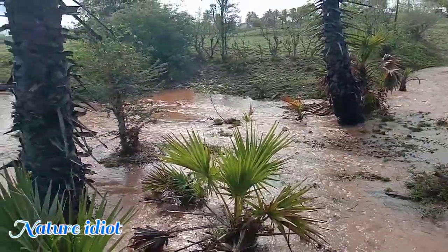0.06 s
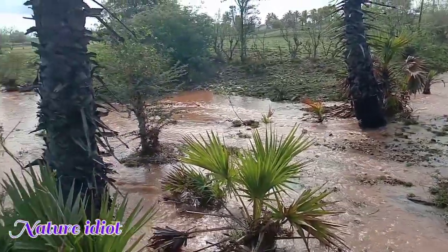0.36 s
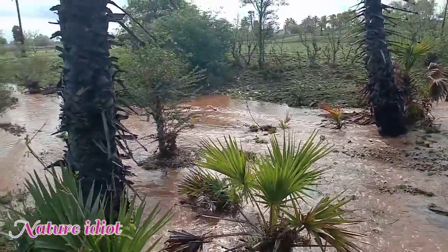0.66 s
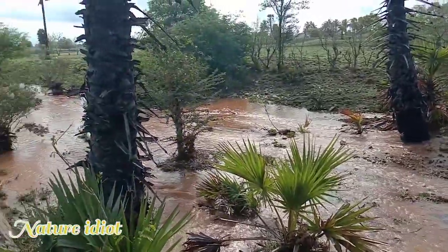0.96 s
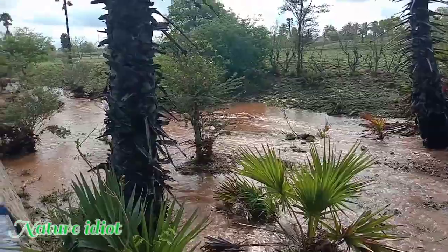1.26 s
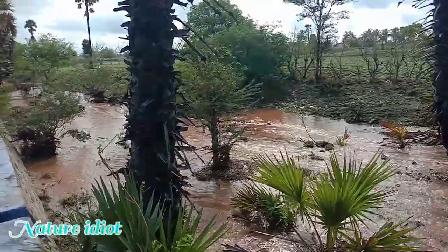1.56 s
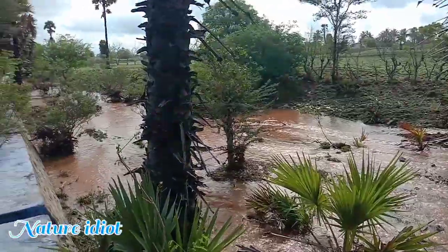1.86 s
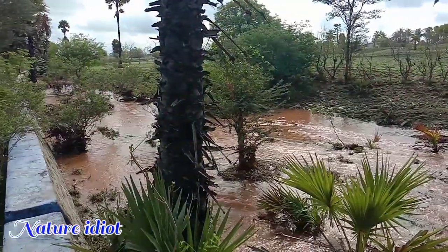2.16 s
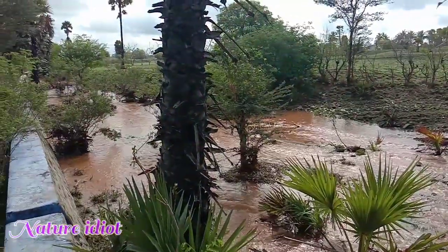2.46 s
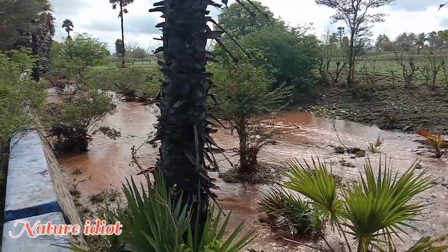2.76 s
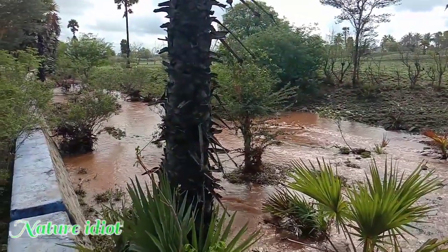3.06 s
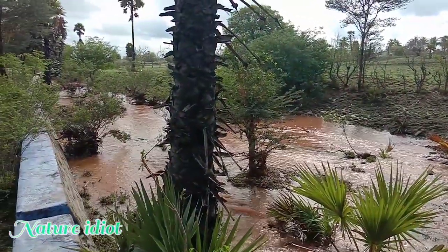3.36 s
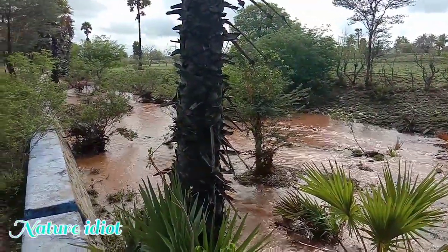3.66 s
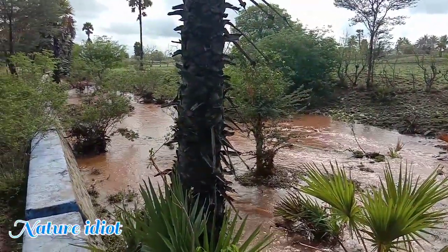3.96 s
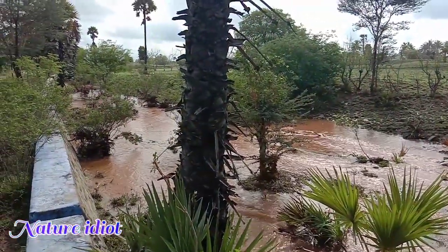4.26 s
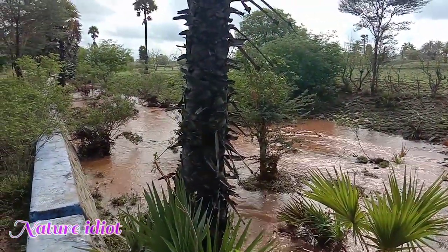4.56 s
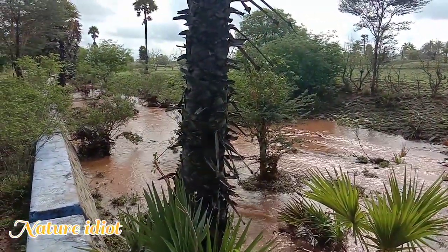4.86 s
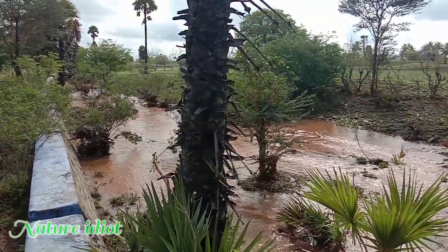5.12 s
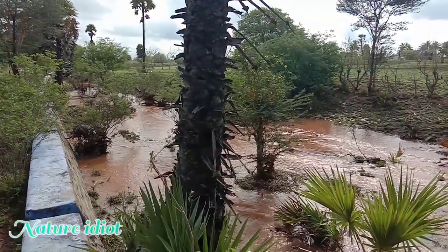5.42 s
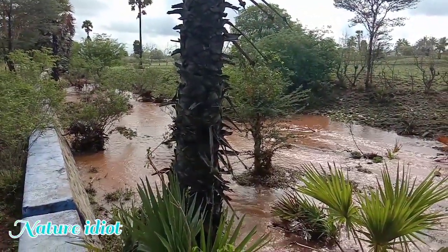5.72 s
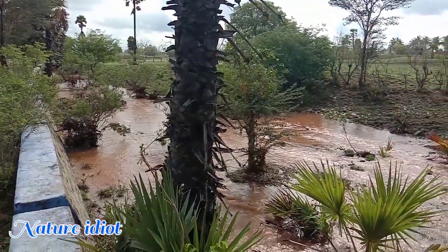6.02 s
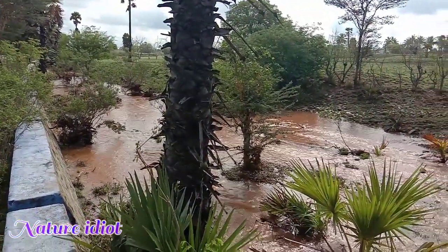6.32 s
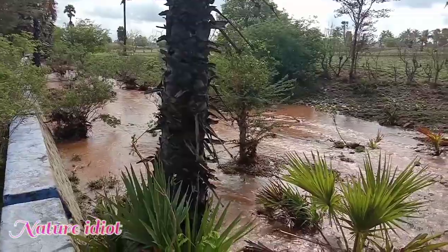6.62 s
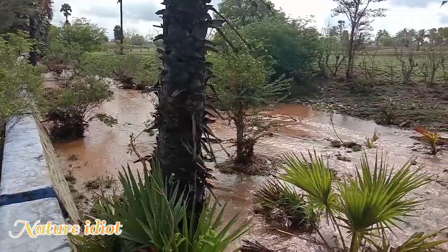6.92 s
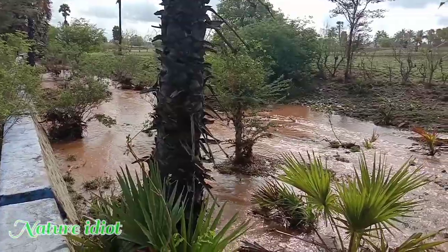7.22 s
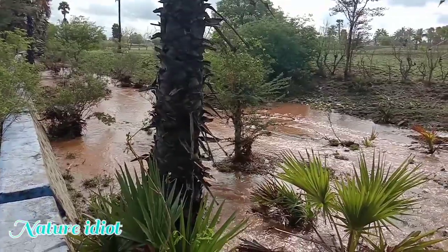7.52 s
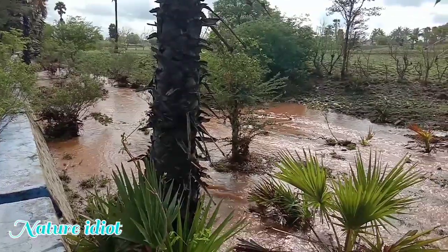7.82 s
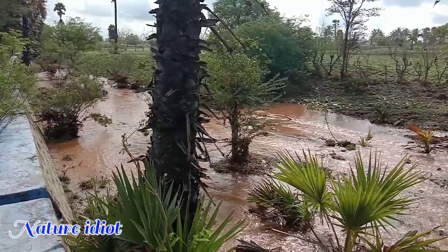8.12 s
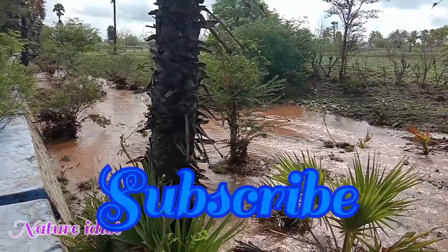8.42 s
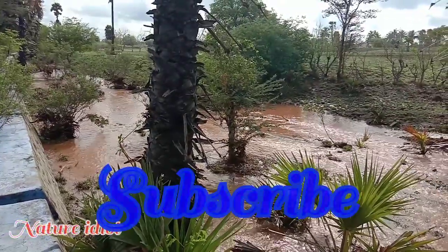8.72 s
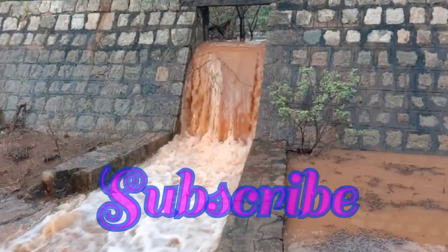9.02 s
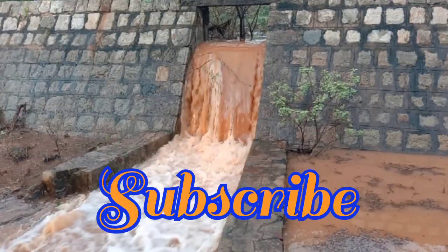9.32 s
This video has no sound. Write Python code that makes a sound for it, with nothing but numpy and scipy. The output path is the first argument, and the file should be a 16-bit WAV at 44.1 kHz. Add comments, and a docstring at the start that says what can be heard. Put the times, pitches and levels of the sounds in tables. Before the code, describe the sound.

A stream rushes and splashes under a steady frog chorus, a chirping cricket and small birds, with a few low microphone bumps.

```python
"""Beside a flooded stream: droplets splash and trapped air bubbles ring over a low rush.
Far frogs pulse their vocal sacs, purring on one note; a close cricket chirps evenly with its wings.
Small birds chip, whistle and rasp; far insects shimmer. Sharp plips, crackles and rustles dot the scene.
Wind and a hand bump the microphone, with one low knock; the sound stops dead near the end."""
import sys
import numpy as np
from scipy import signal
from scipy.fft import rfft, irfft
from scipy.io import wavfile
from scipy.ndimage import uniform_filter1d

SR = 44100
rng = np.random.default_rng(int(sys.argv[2]) if len(sys.argv) > 2 else 0)


def output_pcm(signal):
    """Save a mono or channel-first signal as 16-bit PCM at the path in sys.argv[1].

    Samples are clipped to [-1, 1] before scaling.
    """
    pcm = np.clip(np.atleast_2d(signal).T, -1, 1) * 32767
    wavfile.write(sys.argv[1], SR, np.round(pcm).astype(np.int16))


N = 422458
TIME = np.arange(N) / SR
STOP_S = 8.948


def stream():
    """Running water: a low rush, countless splashing droplets and a fine fizz."""
    # spectra of the three layers: freq_hz, gain_db
    rush_shape = [(26, -53), (45, -17.5), (57, -8), (114, 2.5), (188, -5.5), (239, 1), (317, -26.5),
                  (360, 2), (453, -0.5), (727, -6), (950, 2), (1240, -27.5), (2090, -120)]
    splash_shape = [(600, -32), (1000, -12), (1700, -7.5), (1900, -1), (2300, -1), (2900, 2), (3300, -8),
                    (3700, -12), (4400, -21), (5500, -23), (6300, -27.5), (7100, -18), (8200, -38)]
    fizz_shape = [(4000, -5), (8200, 0), (10000, 8), (11500, 3.5), (13600, -11.5), (15000, 10),
                  (16000, -3.5)]
    # slow swells: time_s, level_db
    splash_curve = [(0, -49), (3.1, -49.7), (3.9, -52), (5.6, -52), (6.7, -49.5), (8.94, -50)]
    fizz_curve = [(0, -73), (1.3, -77.5), (3, -77.5), (3.6, -72.5), (4.6, -75.5), (5.6, -75.5), (7, -78.5),
                  (8.94, -77.5)]
    rush = patchy(colour(rng.standard_normal(N), rush_shape), depth_db=4)
    rush *= amp(-64 + 1.8 * drift(rate_hz=25))
    spray = amp(3.5) * rng.standard_normal(N) + clicks(per_s=1500, spread_db=2.5)
    splash = patchy(colour(spray, splash_shape), depth_db=3)
    splash *= level(splash_curve) * amp(-.58 + .78 * drift(rate_hz=30))
    mist = rng.standard_normal(N) + amp(-3) * clicks(per_s=470, spread_db=5)
    fizz = patchy(colour(mist, fizz_shape), depth_db=4.5)
    fizz *= level(fizz_curve) * amp(.83 * drift(rate_hz=25))
    return rush + splash + fizz


def patchy(x, depth_db):
    """Splashes land at random, each lifting its own band for a moment; rms 1."""
    spectrum = signal.stft(x, nperseg=512)[2]
    patches = uniform_filter1d(rng.standard_normal(spectrum.shape), size=5, axis=0)
    patches = unit(uniform_filter1d(patches, size=7, axis=1))
    return unit(signal.istft(spectrum * amp(depth_db * patches), nperseg=512)[1][:N])


def gurgles():
    """Bubbles in the stream: a soft burble, a few large glugs and a high tinkle."""
    # large bubbles: start_s, pitch_hz, level_db
    glugs = [(.601, 425, -51), (.762, 411, -50), (2.83, 356.4, -50), (4.082, 456, -50.5),
             (4.665, 401, -50.5), (4.83, 442, -49.5), (4.981, 243, -53), (5.391, 377, -50),
             (6.134, 392.6, -47), (6.409, 245, -53.5)]
    burble = amp(-67.5) * bubbles(low_hz=245.8, high_hz=561.4, cycles=12, spread_db=8.5, count=520)
    for start_s, pitch_hz, level_db in glugs:
        add(burble, start_s, amp(level_db) * bubble(pitch_hz, cycles=13.3, rise=.047))
    tinkle = amp(-59.5) * bubbles(low_hz=1860, high_hz=3245, cycles=16, spread_db=7.5, count=1300)
    return burble + tinkle


def bubbles(low_hz, high_hz, cycles, spread_db, count):
    """Many bubbles of random size and strength; rms 1."""
    out = np.zeros(N)
    for when, smallness, strength in rng.random((count, 3)):
        pitch_hz = low_hz * (high_hz / low_hz) ** smallness
        add(out, when * TIME[-1], amp(spread_db * strength ** 3) * bubble(pitch_hz, cycles, rise=.054))
    return unit(out)


def bubble(pitch_hz, cycles, rise):
    """Trapped air rings and rises in pitch as it nears the surface."""
    age = np.arange(int(3 * cycles / pitch_hz * SR)) * pitch_hz / cycles / SR
    envelope = 3 * age * np.exp(1 - 3 * age)
    return envelope * np.sin(2 * np.pi * cycles * (age + rise * age ** 2 / 2))


def frogs(pulse_hz=34, throb_db=2.3, uneven_db=2.5, wash_db=-1, count=7):
    """Each frog pulses its vocal sac at its own pace; the farthest blur into a wash."""
    # vocal sac resonance: freq_hz, gain_db
    sac_shape = [(650, -39), (870, -37.5), (1050, -8.5), (1190, -4.5), (1250, 4), (1320, -2.5), (1480, -10),
                 (1700, -23.5), (2200, -48.5)]
    pulses = np.zeros(N)
    for pace in np.geomspace(.6, 1.6, count):
        turns = np.cumsum(pulse_hz * pace * np.exp(.12 * drift(rate_hz=8))) / SR + rng.random()
        onsets = np.flatnonzero(np.diff(np.floor(turns)))
        throb = np.sin(2 * np.pi * (5 * pace * onsets / SR + rng.random()))
        polarity = rng.choice([-1, 1], N)[onsets]
        uneven = np.clip(rng.standard_normal(N)[onsets], -2, 2)
        pulses[onsets] += polarity * amp(throb_db * throb + uneven_db * uneven)
    voices = unit(pulses) + amp(wash_db) * rng.standard_normal(N)
    return amp(-49 + .5 * drift(rate_hz=12)) * colour(voices, sac_shape)


def cricket(stroke_s=.0126, pitch_hz=5150, sag_hz=330, duty=.9, lead_db=-10, wander_hz=20):
    """Each wing stroke rings one pulse that sags in pitch; a chirp swells from a soft lead stroke."""
    # runs of evenly spaced chirps: start_s, chirp_count, period_s, strokes_per_chirp, relative_db
    runs = [(.146, 16, .2248, 7, -48.8), (3.756, 10, .2358, 7, -46.8), (6.095, 9, .2297, 7, -48.3),
            (8.218, 3, .214, 6, -49.7), (8.929, 1, .23, 3, -48.5)]
    out = np.zeros(N)
    progress = np.arange(0, 1, 1 / (duty * stroke_s * SR))
    envelope = np.sin(np.pi * progress) ** .83
    chirps = [(start_s + n * period_s, strokes, db)
              for start_s, count, period_s, strokes, db in runs for n in range(count)]
    for (chirp_s, strokes, db), (effort, tuning) in zip(chirps, rng.standard_normal((len(chirps), 2))):
        for k, (late, loud, sharp) in enumerate(rng.standard_normal((10, 3))[:strokes]):
            slack = np.exp(-.71 * k)
            hz = pitch_hz + wander_hz * tuning + 22 * sharp - 120 * slack - sag_hz * (progress - .5)
            onset_s = chirp_s + (k - 1 - duty / 2) * stroke_s + .00057 * late
            gain = amp(db + .6 * effort + lead_db * slack + 1.3 * loud)
            add(out, onset_s, gain * envelope * np.sin(phase(hz)))
    return amp(1.5) * out


def bird_chips(plunge_s=.038, fall_hz=2050, arch_hz=380, echo_s=.078, echo_db=-14):
    """A thin arched top with a bright overtone, then a fast plunge; the far bank echoes."""
    # calls: plunge_start_s, hold_s, top_hz, level_db
    calls = [(.053, .035, 3695, -39.5), (5.981, 0.022, 3570, -48.5), (6.233, 0.038, 3650, -46),
             (6.459, 0.027, 3660, -38), (6.682, .038, 3655, -37.5), (6.901, 0.032, 3580, -39.5),
             (7.154, .04, 3706, -36.5), (7.475, .036, 3614, -40.5), (7.863, 0.036, 3710, -45.5),
             (8.393, .015, 3640, -46.5)]
    out = np.zeros(N)
    for plunge_start_s, hold_s, top_hz, level_db in calls:
        t = np.arange(-hold_s, plunge_s, 1 / SR)
        plunge = np.maximum(t / plunge_s, 0)
        arch = (np.minimum(t / hold_s, 0) + .344) ** 2
        angle = phase(top_hz - arch_hz * arch - fall_hz * plunge ** 1.4)
        effort = amp(np.interp(t / plunge_s, [-.16, .13, .44, .76], [-13, 0, -11, -2]))  # two pushes
        voice = effort * np.sin(angle) + amp(-17 - 28 * plunge) * np.sin(2 * angle)
        add(out, plunge_start_s - hold_s, amp(level_db) * voice * signal.windows.tukey(len(t), .25))
    echo = np.roll(outdoors(out, t60_s=.104, wet_db=1.5), round(echo_s * SR))
    return out + amp(echo_db) * echo


def bird_whistles(flutter_hz=235, flutter_depth=.16):
    """Nearly pure notes that bend through three pitches, with a slight flutter."""
    # notes: start_s, length_s, first_hz, middle_hz, last_hz, level_db
    notes = [(1.288, .024, 3180, 3404, 3400, -49), (2.998, .06, 1715, 2312, 1730, -30.5),
             (3.052, 0.0287, 1726, 1620, 1640, -42), (5.44, 0.076, 2510, 2210, 2243, -41),
             (5.776, 0.094, 2470, 2182, 2280, -37.5), (6.093, 0.064, 3280, 3443, 3330, -51.5),
             (8.046, 0.18, 5140, 5360, 5600, -62)]
    out = np.zeros(N)
    for start_s, length_s, *pitches_hz, level_db in notes:
        t = np.arange(0, length_s, 1 / SR)
        hz = np.polyval(np.polyfit([0, .5, 1], pitches_hz, 2), t / length_s)
        flutter = 1 + flutter_depth * np.sin(2 * np.pi * flutter_hz * t)
        add(out, start_s, amp(level_db) * np.sin(np.pi * t / length_s) * flutter * np.sin(phase(hz)))
    return out


def bird_rasps(length_s=.13, width_ratio=.08):
    """Far hoarse calls: dense clicks in a narrow band."""
    # calls: start_s, centre_hz, level_db
    calls = [(6.16, 2500, -48), (6.53, 2420, -48.5), (6.95, 2450, -49.5), (7.32, 2440, -53),
             (8.13, 3660, -54.5), (8.8, 2860, -48.5)]
    return scrapes([(start_s, length_s, hz, width_ratio * hz, db) for start_s, hz, db in calls])


def plips():
    """Sharp plips and ticks, each a brief high ring."""
    # rings: start_s, pitch_hz, t60_s, level_db
    rings = [(1.218, 1970, 0.0037, -10), (1.3305, 3140, .016, -24), (1.478, 1265, 0.032, -29.5),
             (2.24, 2350, .014, -31), (2.932, 2780, 0.021, -33.5), (3.453, 4040, .025, -42.5),
             (5.987, 1440, 0.0071, -25.5), (8.124, 3016, .01, -30), (8.36, 3300, .04, -38.5),
             (8.837, 2920, .016, -25.5)]
    return outdoors(strikes(rings, rise_cycles=1, sag=.046), t60_s=.2, wet_db=-10.5)


def mic_bumps(cutoff_hz=620):
    """Wind buffets, one low knock and a few soft bumps on the microphone: low thuds with no treble."""
    # blows: start_s, pitch_hz, t60_cycles, level_db
    blows = [(.04, 99, 9, -27), (.165, 130, 4, -21), (0.342, 122, 9.3, -26), (0.436, 109, 13, -36),
             (.511, 121.8, 3.6, -17.5), (.527, 70, 6.6, -26.5), (1.275, 367, 9, -29),
             (3.1748, 253, 3.9, -9), (3.179, 147, 8.2, -24), (4.079, 146, 8.1, -43.5),
             (5.31, 119, 4.4, -40.5), (7.86, 101, 5.3, -41), (8.595, 129, 6, -35), (8.856, 100, 4.3, -40)]
    rings = [(start_s, hz, cycles / hz, db) for start_s, hz, cycles, db in blows]
    thuds = outdoors(strikes(rings, rise_cycles=.3, sag=.32), t60_s=.24, wet_db=-20.5)
    return signal.sosfiltfilt(signal.butter(4, cutoff_hz, fs=SR, output="sos"), thuds)


def wind(calm_db=-94.5):
    """A few puffs swell and fade on the microphone, then the air is nearly calm."""
    # puffs: peak_s, fade_20db_s, level_db
    gusts = [(.02, 0.2, -38), (.2, 0.1, -49), (.41, .08, -49), (.6, 0.01, -39.5), (.86, 0.3, -67)]
    # buffeting spectrum: freq_hz, gain_db
    buffet_shape = [(25, -21), (50, -12), (68, 4.5), (95, -3.5), (135, -3), (200, -17), (320, -39.5),
                    (700, -60.5)]
    puffs = sum(amp(db - 20 * ((TIME - peak_s) / fade_s) ** 2) for peak_s, fade_s, db in gusts)
    return (amp(calm_db) + puffs) * colour(rng.standard_normal(N), buffet_shape)


def rustles():
    """Brief rubs made of tiny irregular slips."""
    # rubs: start_s, length_s, centre_hz, width_hz, level_db
    rubs = [(1.26, 0.15, 2260, 1500, -48), (3.096, .055, 272, 200, -57), (3.065, 0.14, 5320, 1150, -54.5),
            (3.179, .06, 305, 300, -47), (3.228, 0.093, 315, 276, -43.5), (3.45, 0.071, 4200, 600, -61),
            (3.558, 0.13, 5430, 1200, -55), (3.64, 0.13, 3710, 900, -58)]
    return scrapes(rubs)


def crackles(faint_count=16, spread_db=6):
    """Tiny bright snaps over the water, each with a faint spray after it."""
    # loudest snaps: start_s, relative_db
    loud = [(.418, -52), (.6823, -53), (1.5015, -52.5), (1.6442, -57), (2.0193, -55), (3.0465, -51),
            (3.1747, -47.5), (4.2617, -56)]
    faint = [(when * STOP_S, -64.5 + spread_db * (2 * size - 1))
             for when, size in rng.random((faint_count, 2))]
    out = np.zeros(N)
    t = np.arange(SR // 20) / SR
    snap, spray = amp(-60 * t / .012), amp(-8.5 - 60 * t / .08)
    for start_s, db in loud + faint:
        add(out, start_s, amp(db) * (snap + spray) * rng.standard_normal(len(t)))
    return amp(-2) * signal.sosfilt(signal.butter(2, 4000, "high", fs=SR, output="sos"), out)


def insects():
    """A far shimmer that comes and goes."""
    # slow swells: time_s, level_db
    buzz_curve = [(0, -67.5), (2.7, -68), (3.6, -66), (4.1, -78.5), (8.94, -75)]
    # buzz spectrum: freq_hz, gain_db
    buzz_shape = [(4500, -27.5), (5200, 1.5), (5550, -4.5), (5850, -5), (6300, -25), (6900, -12),
                  (7500, -19), (8500, -34.5)]
    return level(buzz_curve) * colour(rng.standard_normal(N), buzz_shape) * amp(3.4 * drift(rate_hz=14))


def strikes(rows, rise_cycles, sag):
    """Each blow starts one damped ring, whose pitch relaxes as it dies."""
    out = np.zeros(N)
    for start_s, pitch_hz, t60_s, level_db in rows:
        t = np.arange(0, 1.5 * t60_s, 1 / SR)
        attack = 1 - np.exp(-t * pitch_hz / rise_cycles)
        decay = amp(-60 * t / t60_s)
        hz = pitch_hz * (1 + sag * (decay - .5))
        add(out, start_s, amp(level_db) * attack * decay * np.sin(phase(hz)))
    return out


def scrapes(rows):
    """Short spells of irregular clicks, each through one resonance."""
    out = np.zeros(N)
    slips = clicks(per_s=2500, spread_db=2)
    for start_s, length_s, centre_hz, width_hz, level_db in rows:
        band_hz = [centre_hz - width_hz / 2, centre_hz + width_hz / 2]
        body = signal.butter(3, band_hz, "band", fs=SR, output="sos")
        rub = signal.sosfilt(body, slips[round(start_s * SR):][:round(length_s * SR)])
        add(out, start_s, amp(level_db) * unit(rub) * signal.windows.tukey(len(rub), .5))
    return out


def outdoors(x, t60_s, wet_db):
    """Adds the scatter of trunks and banks."""
    t = np.arange(SR // 2) / SR
    tail = rng.standard_normal(len(t)) * amp(-60 * t / t60_s) * (t > .008)
    return x + amp(wet_db) * signal.oaconvolve(x, tail / np.linalg.norm(tail))[:N]


def clicks(per_s, spread_db):
    """Random clicks, mostly small and a few large; rms 1."""
    size = amp(spread_db * np.minimum(rng.exponential(1, N), 5))
    return unit(size * rng.choice([-1, 1], N) * (rng.random(N) < per_s / SR))


def colour(x, shape):
    """Minimum-phase filter of a (freq_hz, gain_db) shape, so clicks ring after they strike; rms 1."""
    freq_hz, gain_db = np.transpose(shape)
    bins_hz = abs(np.fft.fftfreq(8192, 1 / SR))
    log_gain = np.log(amp(np.interp(np.log(bins_hz + 1), np.log(freq_hz + 1), gain_db)))
    ring = np.fft.ifft(np.exp(np.conj(signal.hilbert(log_gain)))).real
    return unit(signal.oaconvolve(x, ring[:len(ring) // 2])[:N])


def drift(rate_hz):
    """Slow random wander; rms 1."""
    frames = np.arange(0, N + 64, 64)
    bins_hz = np.fft.rfftfreq(len(frames), frames[1] / SR)
    slow = irfft(rfft(rng.standard_normal(len(frames))) / (1 + (bins_hz / rate_hz) ** 4), len(frames))
    return np.interp(np.arange(N), frames, unit(slow))


def phase(hz):
    """Running phase in radians."""
    return 2 * np.pi * np.cumsum(hz) / SR


def amp(db):
    """Decibels to gain."""
    return 10 ** (np.asarray(db) / 20)


def unit(x):
    """Scales to rms 1."""
    return x / np.sqrt(np.mean(x ** 2) + 1e-20)


def level(curve):
    """Gain along a (time_s, level_db) curve."""
    return amp(np.interp(TIME, *np.transpose(curve)))


def add(mix, start_s, sound):
    """Mixes a sound in at start_s."""
    part = mix[max(round(start_s * SR), 0):][:len(sound)]
    part += sound[:len(part)]


def scene():
    """Water and animals in the open air, wind and bumps at the microphone."""
    birds = bird_rasps() + outdoors(bird_chips() + bird_whistles(), t60_s=.29, wet_db=-7)
    near = outdoors(cricket(), t60_s=.15, wet_db=-16.5) + plips() + mic_bumps()
    water = stream() + gurgles() + crackles()
    return (water + frogs() + insects() + birds + near + rustles() + wind())[None]


def record(dry, low_hz=52, high_hz=15600, fade_s=.0056):
    """The microphone sheds deep bass, the sound is switched off, and the band is limited."""
    thinned = signal.sosfilt(signal.butter(3, low_hz, "high", fs=SR, output="sos"), dry)
    switch = np.clip((STOP_S - TIME) / fade_s + .5, 0, 1)
    lowpass = signal.firwin(511, high_hz, window=("kaiser", 9), fs=SR)
    return signal.oaconvolve(thinned * switch, lowpass[None], "same")


dry = scene()
out = record(dry)
output_pcm(out)
```